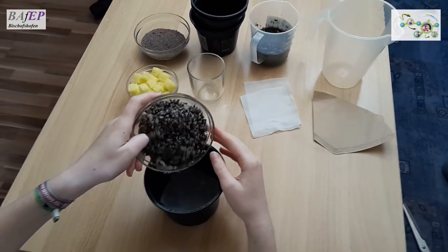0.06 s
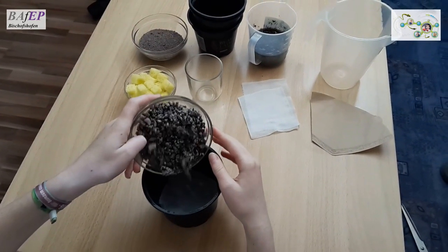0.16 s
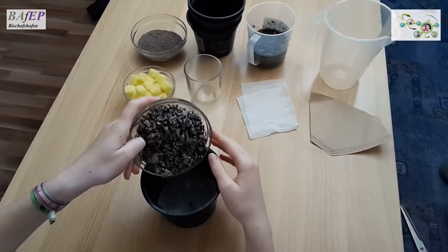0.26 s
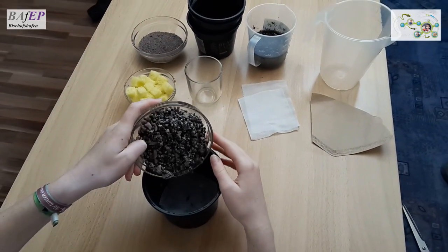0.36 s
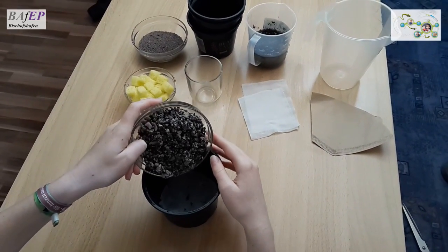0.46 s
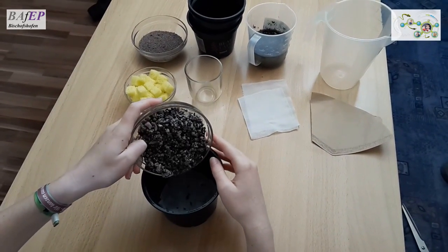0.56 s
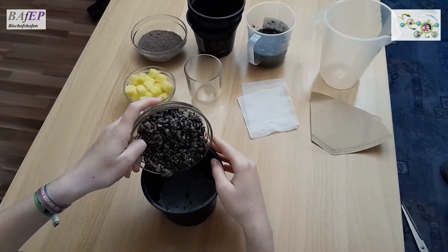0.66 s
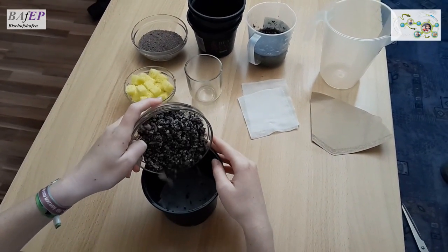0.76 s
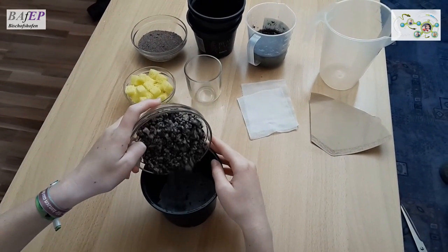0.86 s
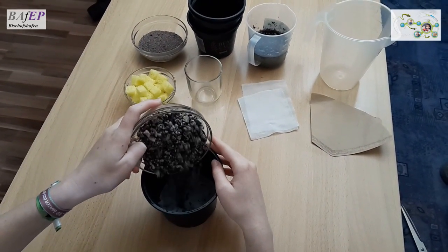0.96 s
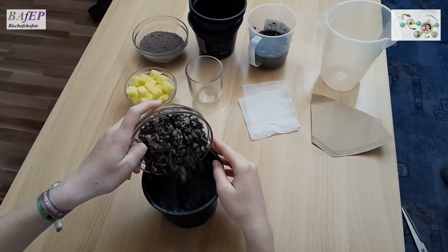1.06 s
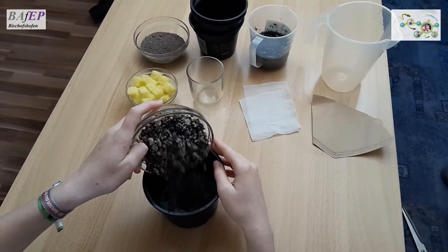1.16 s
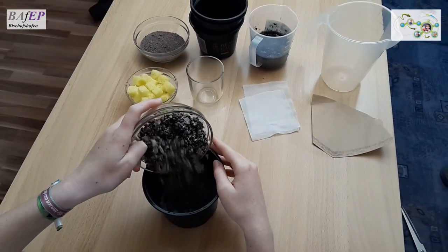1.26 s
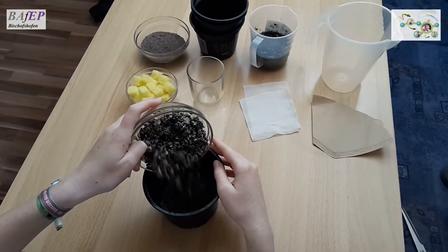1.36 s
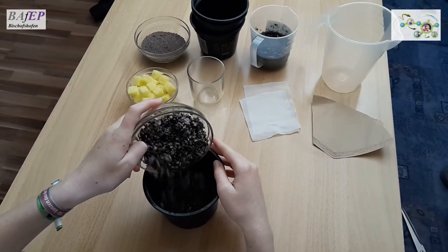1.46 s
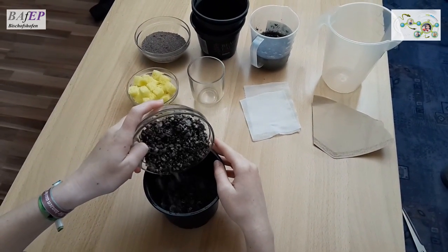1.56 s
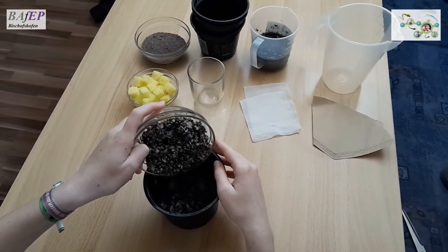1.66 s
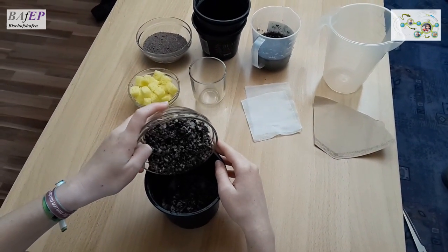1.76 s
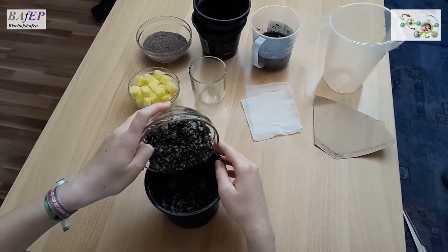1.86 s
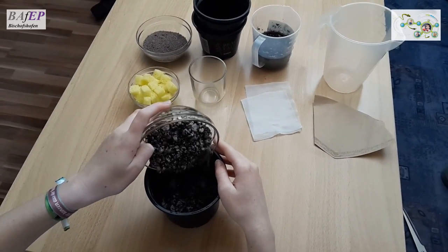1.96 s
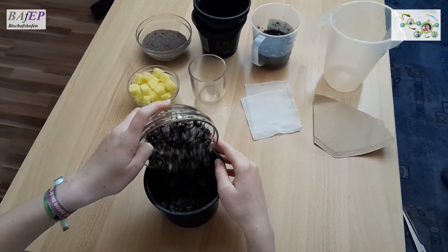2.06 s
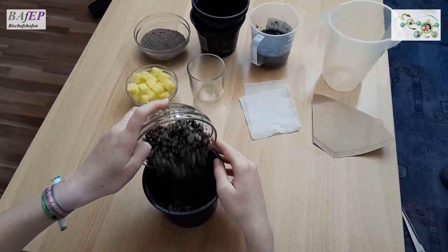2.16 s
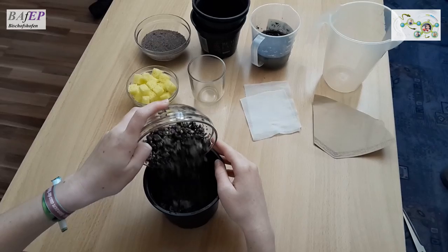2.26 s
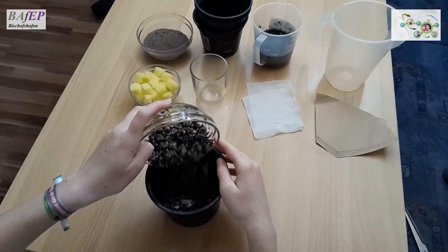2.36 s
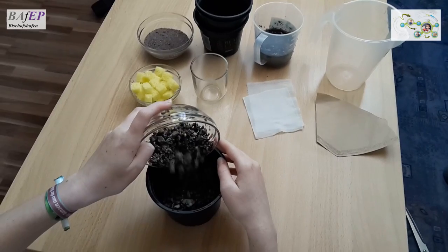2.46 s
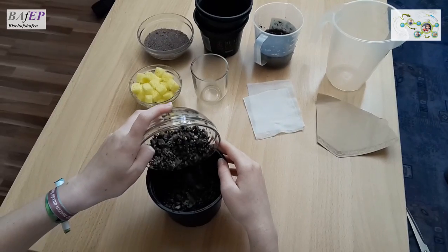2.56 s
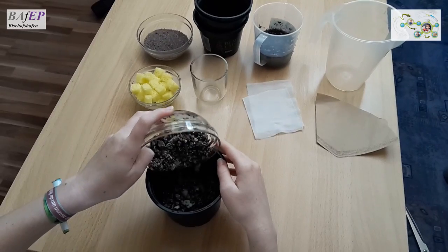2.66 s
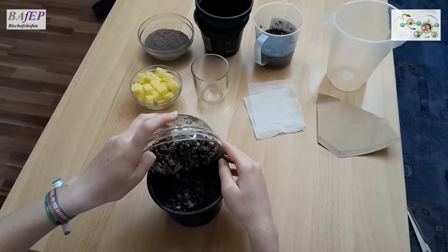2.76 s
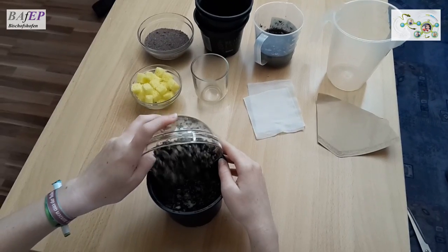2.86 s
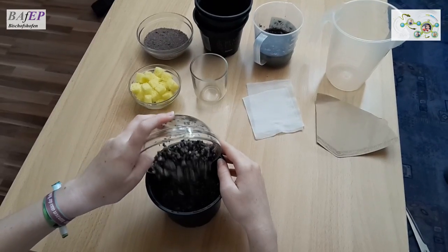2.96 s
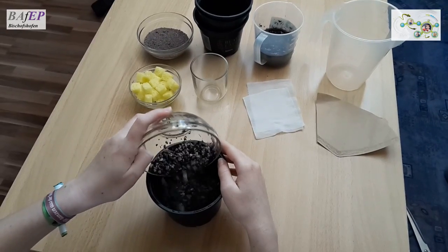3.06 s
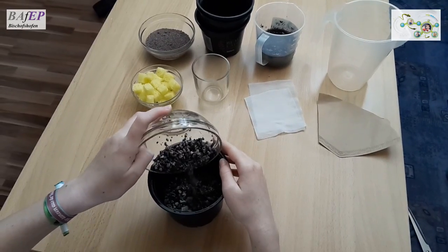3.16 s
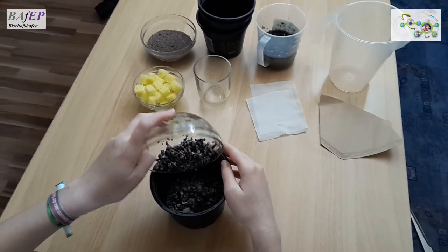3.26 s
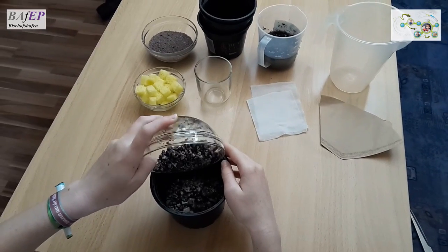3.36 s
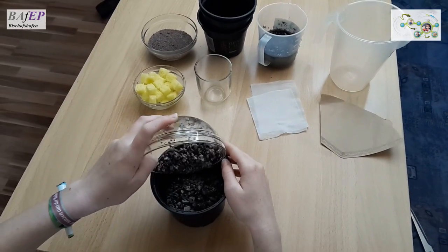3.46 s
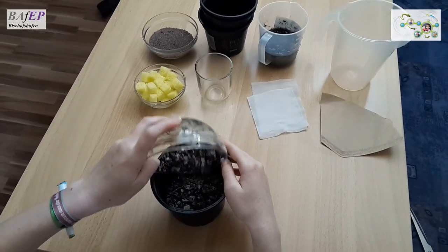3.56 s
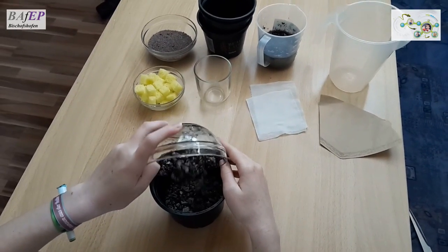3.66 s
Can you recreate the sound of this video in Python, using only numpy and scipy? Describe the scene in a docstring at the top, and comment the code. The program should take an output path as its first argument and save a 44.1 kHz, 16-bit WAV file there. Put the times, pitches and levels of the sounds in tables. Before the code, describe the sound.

Small gravel pours from a glass bowl into a plastic flower pot in three rattling surges.

```python
"""Small gravel lands in a plastic flower pot in three surges, as short cracks and knocks, in a furnished room.
Each stone excites many short, damped resonances of the pot wall and bed (modal synthesis).
The gravel slides out of a tilted glass bowl: ticks and slips excite the hand-damped glass, which rings briefly.
The room answers with decaying noise, over a steady room tone."""
import sys
import numpy as np
from scipy import signal
from scipy.fft import rfft, irfft
from scipy.io import wavfile
from scipy.ndimage import uniform_filter1d

SR = 44100
rng = np.random.default_rng(int(sys.argv[2]) if len(sys.argv) > 2 else 0)


def dump(signal):
    """Clip the signal to [-1, 1] and save it as 16-bit WAV at the path in sys.argv[1]."""
    limited = np.clip(np.atleast_2d(signal).T, -1, 1)
    pcm = np.round(limited * 32767).astype(np.int16)
    wavfile.write(sys.argv[1], SR, pcm)


N = 165375

STONE_SPREAD_DB = 5.5   # scale of the exponential spread of stone sizes
OPPOSITE = np.array([[1], [-1]])   # the side signal enters left and right with opposite sign


def amp(db):
    """Level definition: amplitude ratio of a level in dB."""
    return 10 ** (np.asarray(db) / 20)


def rms_one(x):
    """Normalisation: scale a signal to a root mean square of one."""
    return x / np.sqrt(np.mean(x ** 2) + 1e-20)


def at_hz(points, hz):
    """Logarithmic pitch scale: interpolate a table of (frequency [Hz], value) over log frequency."""
    p = np.array(points, float)
    return np.interp(np.log(np.maximum(hz, 1)), np.log(np.maximum(p[:, 0], 1)), p[:, 1])


def shower(per_s, spread_db, count):
    """Poisson process: random impacts of uneven size, with the summed power of 1000 unit impacts a second."""
    draw = rng.random((count, 2))
    s = -np.cumsum(np.log(1 - draw[:, 0])) / per_s
    size_db = -spread_db * np.log(np.maximum(draw[:, 1], .05))
    size_db = size_db - 10 * np.log10(np.mean(amp(2 * size_db)) * per_s / 1000)
    kept = s < N / SR
    return s[kept], size_db[kept], kept


def train(s, heights):
    """Impulsive excitation: one click per impact, at its nearest earlier sample."""
    sample = np.clip((s * SR).astype(int), 0, N - 1)
    return np.bincount(sample, heights, N) + 1e-18


def placed(x, pan_db, lead_s):
    """Stereo localisation: a level difference (left minus right) and a lead of the left side."""
    t = np.arange(N)
    left, right = x * np.ones((2, 1))
    late_right = np.interp(t - lead_s * SR, t, right)
    return np.array([amp(pan_db / 2) * left, amp(-pan_db / 2) * late_right])


# spectrum of the room tone: (frequency [Hz], relative level [dB per Hz])
HUSH_SPECTRUM = [(25, -31), (55, 11), (130, -1), (330, -9.5), (1150, -4.5), (6300, -13), (10000, -24),
                 (16000, -28)]
HUSH_DB = -66


def hush():
    """Stationary noise: filtered Gaussian noise, partly correlated between the sides, as room tone."""
    colour = amp(at_hz(HUSH_SPECTRUM, np.fft.rfftfreq(N, 1 / SR)))
    mid, side = irfft(rfft(rng.standard_normal((2, N))) * colour, N)
    return amp(HUSH_DB) * rms_one(mid + .5 * side * OPPOSITE)


# reverberation time of the room: (frequency [Hz], time to fall 60 dB [s])
REVERBERATION = [(200, 0.22), (1000, 0.52), (4000, 0.24), (12000, 0.12)]
ROOM_DB, FIRST_ECHO_S = -0.5, 0.0012
ALIKE_BELOW_HZ = 390   # the echoes of the two sides are similar in the bass


def room(x):
    """Diffuse reverberation: octave bands of exponentially decaying noise, whose sides share mostly the bass."""
    t, tail = np.arange(int(.7 * SR)) / SR, 0
    for low in 90 * 2. ** np.arange(8):
        band = signal.butter(2, [low, min(2 * low, .45 * SR)], "band", fs=SR, output="sos")
        noise = signal.sosfilt(band, rng.standard_normal((2, len(t))))
        mid, side = noise * amp(-60 * t / at_hz(REVERBERATION, 0.89 * low))
        alike = 1 / (1 + (low / ALIKE_BELOW_HZ) ** 2)   # correlation of left and right
        tail = tail + np.sqrt(1 + alike) * mid + np.sqrt(1 - alike) * side * OPPOSITE
    tail = tail * np.clip(t / FIRST_ECHO_S - 1, 0, 1)   # silent until the first echo
    tail = tail / np.sqrt(np.sum(tail ** 2) / 2)
    return amp(ROOM_DB) * signal.fftconvolve(x[None], tail)[:, :N]


# stones ticking on the glass: (time [s], relative level [dB], extra level of the low modes [dB])
GLASS_TICKS = [(0.0207, -40.5, -4), (0.1148, -44, 6), (0.216, -29.5, -8), (0.2275, -26, 6.5),
               (0.2427, -26, 2.5), (0.2513, -29.5, -5), (0.264, -32, 5), (0.2859, -33.5, 7.5),
               (0.3704, -29, -2), (3.6952, -54, -7), (3.716, -38, -2)]
# gravel sliding on the glass: (time [s], relative level [dB])
GLASS_SLIDE = [(0, -67.5), (.24, -61), (.6, -53.5), (.78, -69), (1.0, -57), (1.7, -48), (1.9, -88),
               (2.12, -60.5), (2.5, -47), (2.88, -62), (3.0, -52), (3.25, -42), (3.55, -77), (3.63, -60.5),
               (3.75, -63)]
# modes of the bowl: (frequency at pitch share one [Hz], relative level [dB], time to fall 60 dB [s])
BOWL_MODES = [(1158, -23, 0.013), (2334, -19, 0.018), (2570, -12.5, 0.0071), (2800, -10.5, 0.0045),
              (4250, -7, 0.011), (5880, -4, 0.0043), (6476, -1.5, 0.013), (9010, -17, 0.013),
              (12000, -17, 0.0034), (15400, -21, 0.0073)]
# pitch of the loaded bowl: (time [s], share of the mode frequency [ratio])
LOAD_PITCH = [(0, 1), (.45, 1), (1.3, .95), (2.4, .945), (3.0, .99), (3.6, 1.012)]
SLIPS_PER_S, MAX_SLIPS = 900, 6000
TICK_DB, SLIDE_DB = 2.5, 2.5   # from a table level to the push on the modes
CONTACT_S = .0007   # scatter of the impact moments, and softness of the contact
LOW_MODES_HZ, GLASS_SPREAD_DB = 3500, 2
POUR_START_S, POUR_END_S = .42, 3.55
MUTED_HZ, MUTED_DB = 5000, -8   # gravel moving along the wall mutes the modes below
GRIT_HZ = 5000   # highpass of the bare click of stone on glass, heard between the modes


def bowl():
    """Modal vibration under mass loading: soft impacts excite glass modes, lowered while gravel weighs on the wall."""
    ticks_s, ticks_db, ticks_low_db = np.transpose(GLASS_TICKS)
    slips_s, size_db, _ = shower(SLIPS_PER_S, STONE_SPREAD_DB, count=MAX_SLIPS)
    slips_db = np.interp(slips_s, *np.transpose(GLASS_SLIDE)) + size_db + SLIDE_DB
    s = np.r_[ticks_s, slips_s]
    db = np.r_[ticks_db + TICK_DB, slips_db]
    low_db = np.r_[ticks_low_db, np.zeros(len(slips_s))]
    muted_db = MUTED_DB * ((s > POUR_START_S) & (s < POUR_END_S))
    chance = rng.standard_normal((len(s), len(BOWL_MODES)))

    grit = train(s + CONTACT_S * np.abs(chance[:, 0]), amp(db) * np.sign(chance[:, 1]))
    out = signal.sosfilt(signal.butter(1, GRIT_HZ, "high", fs=SR, output="sos"), grit)

    # integrated pitch share: phase per Hz of mode frequency, in turns
    turns = np.cumsum(np.interp(np.arange(N) / SR, *np.transpose(LOAD_PITCH))) / SR
    soft = np.exp(-1 / (CONTACT_S * SR))
    for k, (hz, mode_db, t60) in enumerate(BOWL_MODES):
        push_db = db + mode_db + GLASS_SPREAD_DB * chance[:, k]
        push_db = push_db + low_db * (hz < LOW_MODES_HZ) + muted_db * (hz < MUTED_HZ)
        clicks = train(s + CONTACT_S * np.abs(chance[:, k - 1]), amp(push_db))
        # decay is filtered at zero frequency, then turned back up to the gliding mode
        spin = np.exp(2j * np.pi * hz * turns)
        struck = signal.lfilter([1 - soft], [1, -soft], clicks / spin)
        ringing = signal.lfilter([1], [1, -amp(-60 / (t60 * SR))], struck)
        out = out + (spin * ringing).imag
    return out


# stones landing in the pot: (time [s], relative level of the crack [dB], of the knock [dB], of the middle [dB])
POT_LANDINGS = [(0.417, -25.5, -47, -36), (0.4569, -18.5, -63, -36.5), (0.4728, -21, -47, -33.5),
                (0.5191, -21, -33, -31), (0.5769, -18.5, -67.5, -35), (0.5811, -16.5, -40.5, -35),
                (0.6692, -17, -65, -62), (0.8066, -26.5, -39, -42), (0.8245, -65, -37.5, -70),
                (0.8895, -23.5, -48, -59), (0.9708, -28.5, -82, -50), (1.0328, -13, -27, -28.5),
                (1.039, -23, -30, -28), (1.0596, -26, -33.5, -20.5), (1.0878, -10.5, -25, -39),
                (1.1864, -8, -29.5, -30.5), (1.216, -17, -42.5, -28), (1.2519, -19.5, -29.5, -25.5),
                (1.312, -10.5, -30, -28.5), (1.3645, -29, -27.5, -34.5), (1.411, -12, -37.5, -35),
                (1.4821, -40, -35.5, -30), (1.551, -11.5, -57, -42), (1.587, -39, -61, -39),
                (1.5967, -17, -57, -63), (1.628, -21, -45, -55), (1.6349, -15.5, -52, -36.5),
                (1.654, -29, -59, -40), (1.6759, -19, -37.5, -41), (1.706, -20.5, -39, -37),
                (1.7902, -27, -41, -41.5), (1.854, -30.5, -76, -67), (2.0878, -32, -54, -48.5),
                (2.1799, -29, -50, -42.5), (2.2272, -28, -62, -57), (2.2582, -20.5, -38, -39),
                (2.2696, -22.5, -74, -32), (2.363, -22, -48, -40), (2.3839, -16, -50, -38.5),
                (2.427, -20.5, -45, -33), (2.4811, -15.5, -39, -39), (2.4878, -16, -44.5, -29.5),
                (2.5004, -21, -42, -43), (2.5119, -13.5, -49, -34), (2.5566, -24.5, -68, -44),
                (2.584, -20.5, -36.5, -30.5), (2.622, -27, -41.5, -35.5), (2.7141, -20, -68, -56),
                (2.7463, -24, -68, -62), (2.794, -22.5, -66, -56), (2.8534, -20.5, -51, -42),
                (2.9824, -46, -46, -41), (3.0412, -25, -60, -48), (3.056, -18.5, -37, -33),
                (3.147, -27, -44, -31), (3.1655, -16, -38.5, -29), (3.171, -17, -53, -32),
                (3.1978, -16, -44, -34), (3.206, -25, -52, -36), (3.2273, -12, -54, -36.5),
                (3.233, -12.5, -50, -39), (3.239, -32, -36, -27.5), (3.3394, -16, -47, -41),
                (3.3484, -24, -45.5, -35.5), (3.4729, -22, -53, -58)]
# the stream of lesser stones: (time [s], relative level of the crack [dB], of the knock [dB],
# extra level of the fizz as stone meets stone [dB])
POT_STREAM = [(.4, -71, -56, -2), (.47, -51, -56, 1.5), (.62, -58, -68, -7), (.85, -86, -64, -5),
              (1.0, -76, -60, 1), (1.05, -37.5, -46, -3), (1.15, -55, -70, -6), (1.28, -40.5, -48.5, 1),
              (1.5, -45, -43, 9.5), (1.7, -41.5, -52.5, 3), (1.82, -55, -49.5, 16), (1.931, -63.5, -85, 16),
              (2.06, -84, -96, -16), (2.18, -57, -46, -4), (2.3, -44, -41.5, 10), (2.5, -41, -52, 9.5),
              (2.681, -43.5, -42, 15.5), (2.78, -58, -67, 9.5), (3.03, -54, -56, 6), (3.079, -36.5, -43, 6),
              (3.221, -38.5, -49, -1), (3.3, -42.5, -61, 8), (3.45, -85, -63, -3)]
# colour of a landing: (frequency [Hz], relative level [dB])
POT_COLOUR = [(70, -22), (160, -25), (300, -15.5), (520, -16), (720, -2.5), (1300, -3.5), (2400, -5),
              (4300, -1.5), (6200, 1.5), (7400, -10.5), (10500, -26), (15500, -31.5)]
STONES_PER_S, MAX_STONES = 650, 6500
CRACK_DB, LANDING_DB, STREAM_DB = -10, 9.5, -2.5   # from a table level to the push on the modes
BOOM_HZ, KNOCK_HZ, MIDDLE_HZ, CRACK_HZ, FIZZ_HZ = 373, 720, 2220, 5440, 13100
BOOM_DB_PER_S = -8   # as the pot fills, stone falls on stone: less boom
RING_CYCLES, LONGEST_RING_S = 37.2, 0.082   # a mode falls 60 dB in this many cycles, or in this time if sooner
MODE_SPREAD_DB = 4
LANDING_SPREAD = 0.41   # share of the random mode spread given to the listed landings
SMEAR_S, SIDE_SMEAR = .0013, .08   # scatter of the modes' moments; share that differs between the sides
SIDE_SPREAD_DB = 6.5   # each mode of each stone favours a side
BASS_CUT_HZ = 61


def pot():
    """Modal superposition: each stone excites many short resonances of wall and bed, each at its own moment."""
    s, size_db, _ = shower(STONES_PER_S, STONE_SPREAD_DB, count=MAX_STONES)
    when, stream_crack, stream_knock, fizz = np.transpose(POT_STREAM)
    crack = np.interp(s, when, stream_crack, -120, -120) + size_db + STREAM_DB
    knock = np.interp(s, when, stream_knock, -120, -120) + size_db + STREAM_DB
    stream = np.transpose([s, crack, knock, (knock + crack) / 2])
    landings = np.array(POT_LANDINGS) + [0, CRACK_DB, LANDING_DB, LANDING_DB]
    s, crack, knock, middle = np.vstack([landings, stream]).T
    boom = knock + BOOM_DB_PER_S * (s - 2)
    levels = np.transpose([boom, knock, middle, crack, crack + np.interp(s, when, fizz)])

    pitches = np.geomspace(70, 15500, num=58)
    anchors = np.log([BOOM_HZ, KNOCK_HZ, MIDDLE_HZ, CRACK_HZ, FIZZ_HZ])
    chance = rng.standard_normal((len(s), 4, len(pitches)))
    moment, strength, lean, side_moment = chance.transpose(1, 0, 2)
    # each stone favours a few neighbouring modes
    strength = rms_one(uniform_filter1d(strength, size=4, axis=1))
    strength[:len(landings)] *= LANDING_SPREAD

    out = 0
    for k, hz in enumerate(pitches):
        # weight of each of the five levels at this pitch
        share = np.array([np.interp(np.log(hz), anchors, one) for one in np.eye(5)])
        db = levels @ share + at_hz(POT_COLOUR, hz) + 20 * np.log10(hz / CRACK_HZ)
        db = db + MODE_SPREAD_DB * np.tanh(strength[:, k])
        clicks = []
        for side in (.5, -.5):   # left, right
            delay = SMEAR_S * np.abs(moment[:, k] + side * SIDE_SMEAR * side_moment[:, k])
            side_db = db + side * SIDE_SPREAD_DB * np.tanh(lean[:, k])
            clicks.append(train(s + delay, amp(side_db) * (-1) ** k))
        # two-pole resonator: a decaying sine per click
        r = amp(-60 / (min(RING_CYCLES / hz, LONGEST_RING_S) * SR))
        w = 2 * np.pi * hz / SR
        out = out + signal.lfilter([0, np.sin(w)], [1, -2 * r * np.cos(w), r * r], clicks)
    return signal.sosfilt(signal.butter(2, BASS_CUT_HZ, "high", fs=SR, output="sos"), out)


BOWL_PAN_DB, POT_PAN_DB, POT_LEAD_S = -13.5, -6.5, .00025   # pan is left minus right; the left side leads
SPOT_S = .03   # a spot among four is drawn this often


def scene():
    """Superposition of direct sound, echo and room tone; the source wanders among four spots, each with its echo."""
    stones, glass = pot(), bowl()
    spot = np.repeat(rng.integers(0, 4, N // 100), int(SPOT_S * SR))[:N]
    both = stones.mean(axis=0) + glass
    echo = 0
    for k in range(4):
        presence = uniform_filter1d(1. * (spot == k), size=200)
        echo = echo + room(both * presence)
    direct = placed(stones, POT_PAN_DB, POT_LEAD_S) + placed(glass, BOWL_PAN_DB, 0)
    return direct + echo + hush()


# colour of the microphone pair: (frequency [Hz], left minus right [dB])
PAIR_COLOUR = [(100, 1.5), (3500, 3), (6800, -4), (10000, -1.5), (14000, 6)]
STOPBAND_HZ = 16200   # from here up the sound is at least 60 dB down


def record(dry):
    """Linear filtering: the two microphones differ in frequency response, and a lowpass cuts the top."""
    tilt_db = at_hz(PAIR_COLOUR, np.fft.rfftfreq(N, 1 / SR)) / 2
    paired = irfft(rfft(dry) * amp([tilt_db, -tilt_db]), N)
    return signal.sosfilt(signal.cheby2(14, 60, STOPBAND_HZ, fs=SR, output="sos"), paired)


dry = scene()
out = record(dry)
dump(out)
```